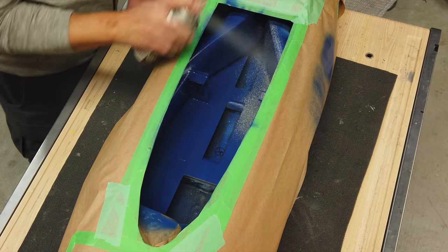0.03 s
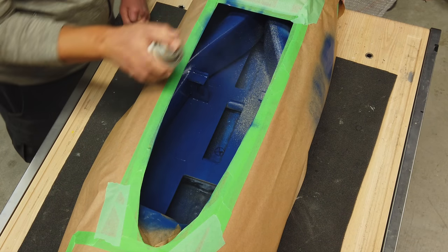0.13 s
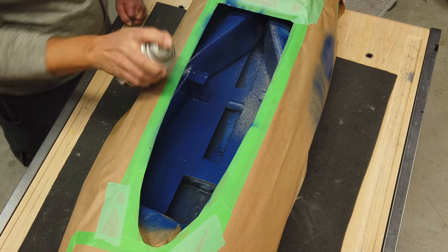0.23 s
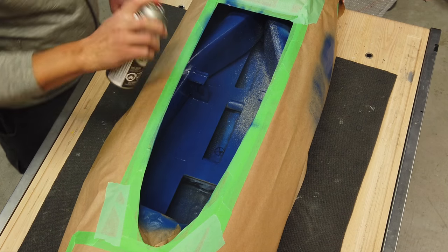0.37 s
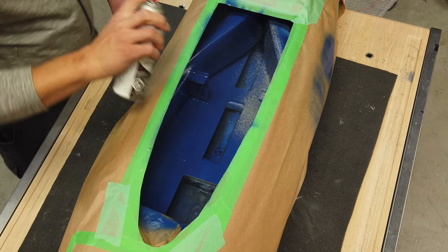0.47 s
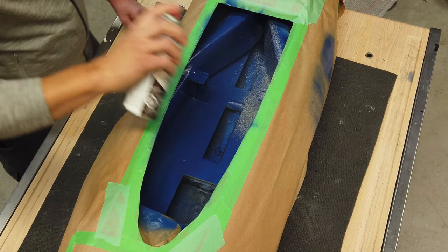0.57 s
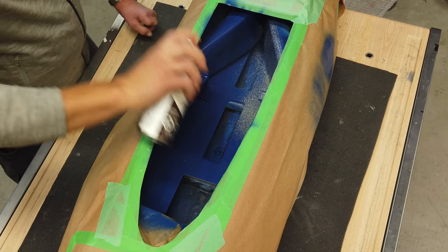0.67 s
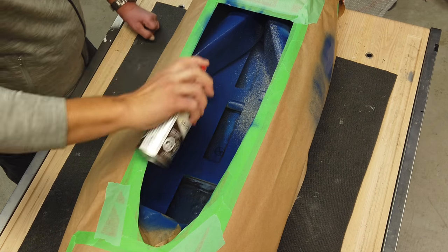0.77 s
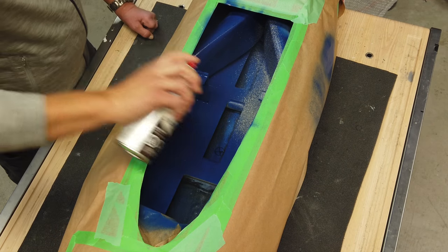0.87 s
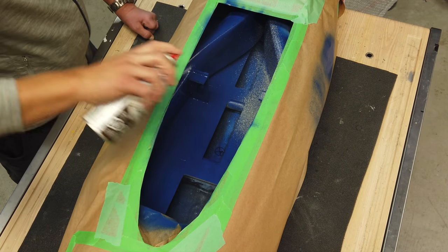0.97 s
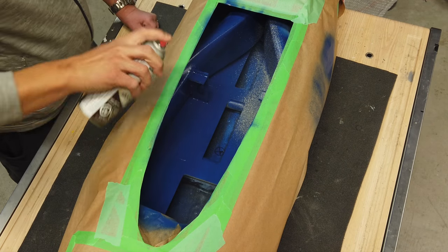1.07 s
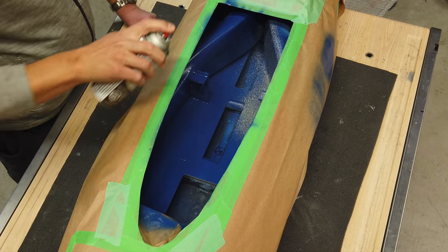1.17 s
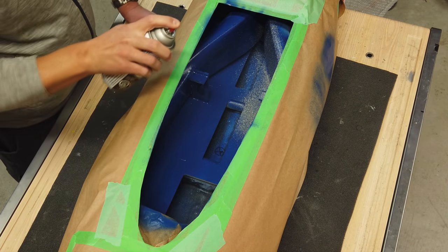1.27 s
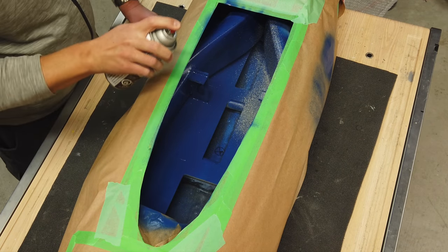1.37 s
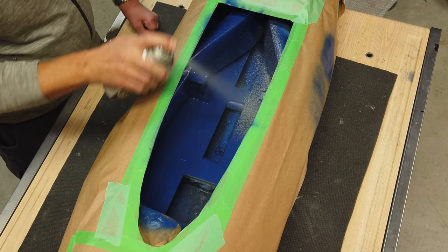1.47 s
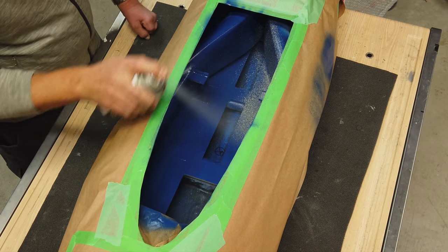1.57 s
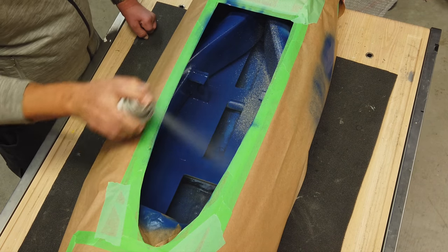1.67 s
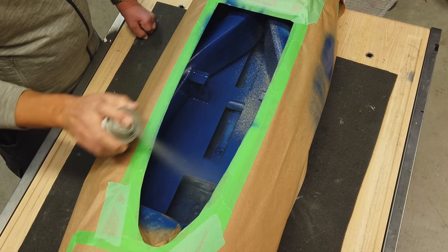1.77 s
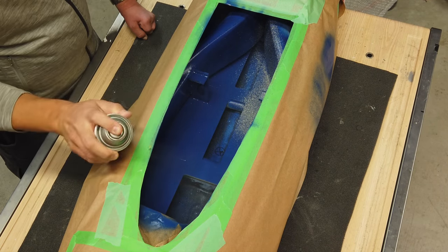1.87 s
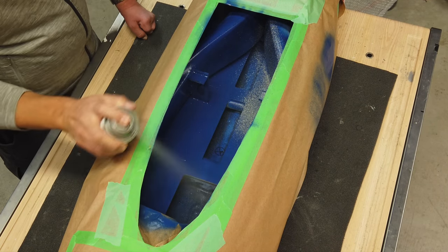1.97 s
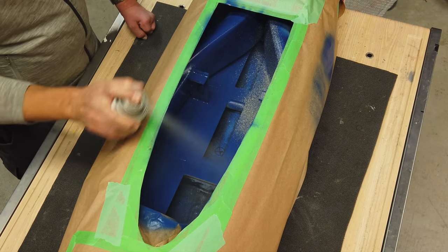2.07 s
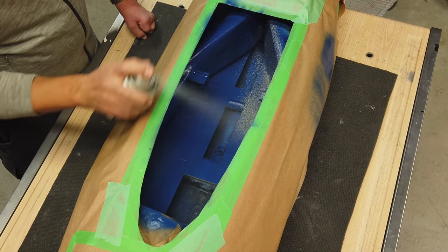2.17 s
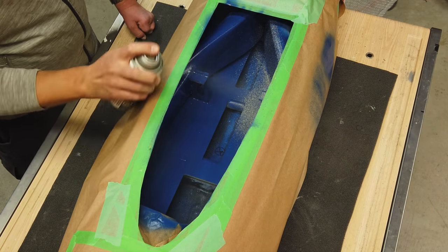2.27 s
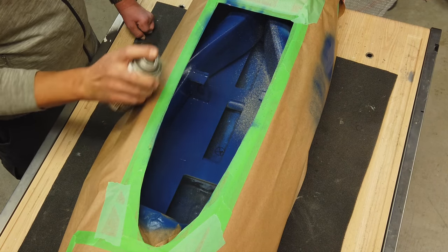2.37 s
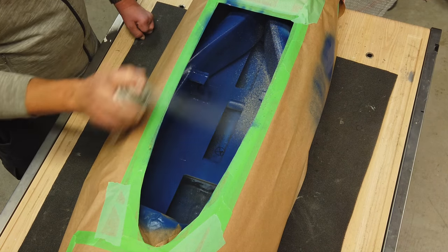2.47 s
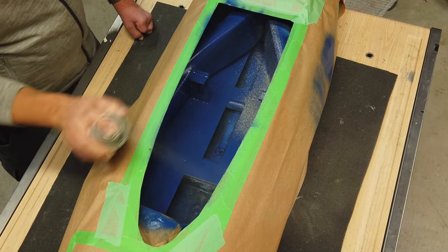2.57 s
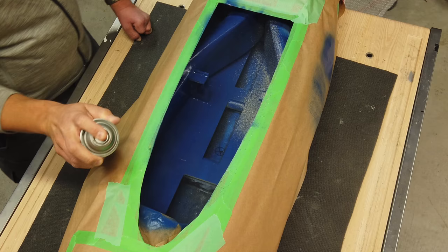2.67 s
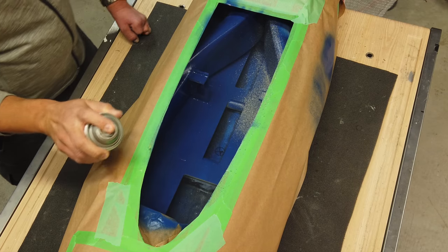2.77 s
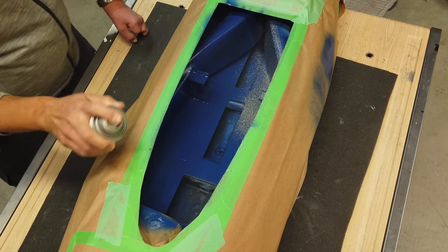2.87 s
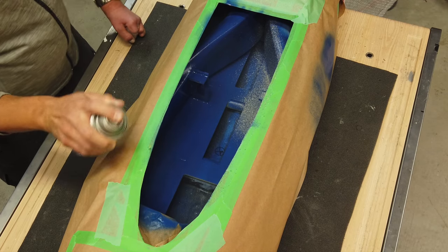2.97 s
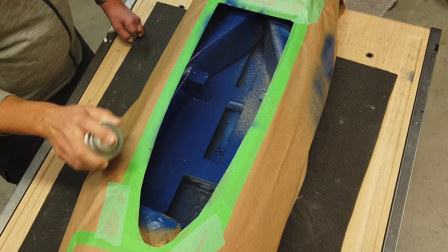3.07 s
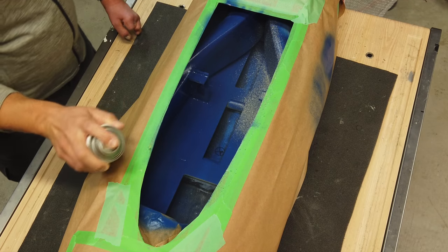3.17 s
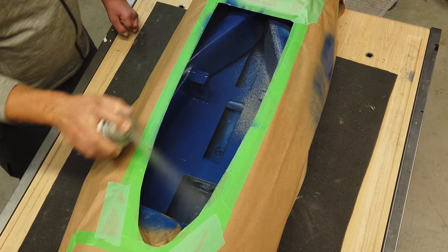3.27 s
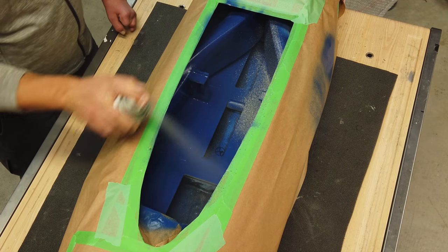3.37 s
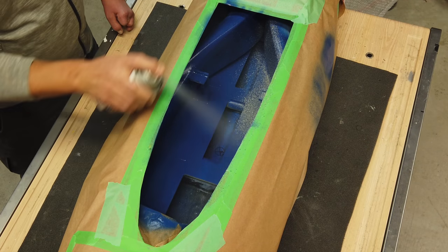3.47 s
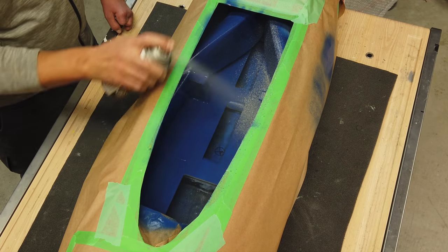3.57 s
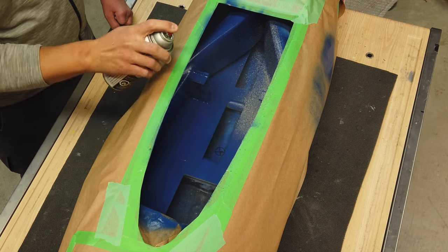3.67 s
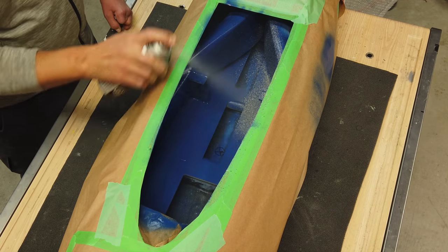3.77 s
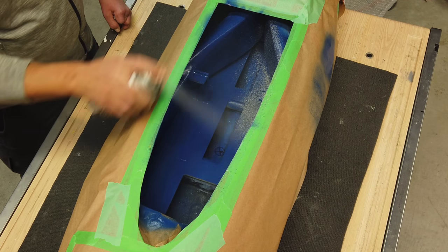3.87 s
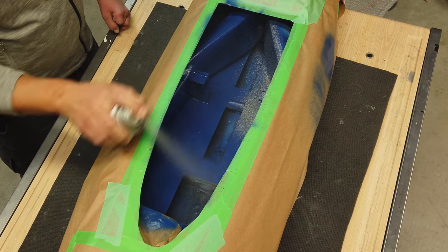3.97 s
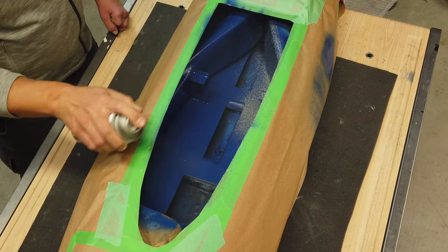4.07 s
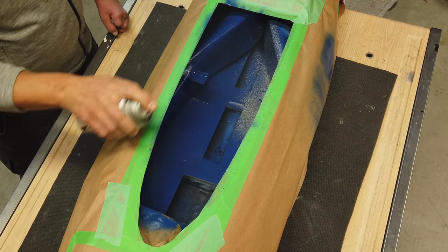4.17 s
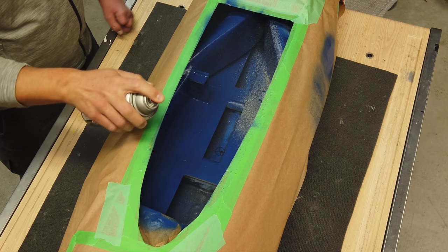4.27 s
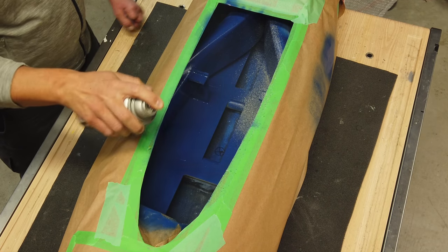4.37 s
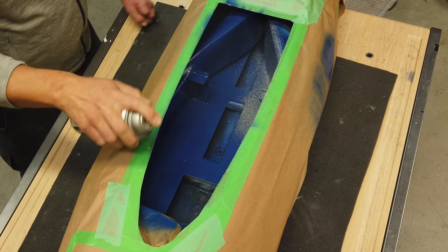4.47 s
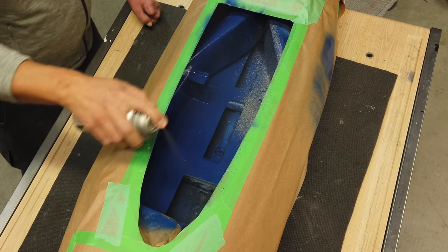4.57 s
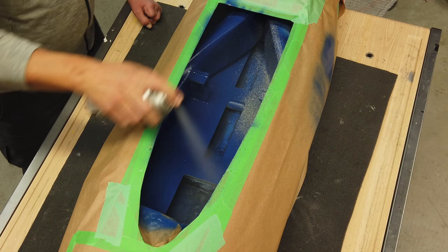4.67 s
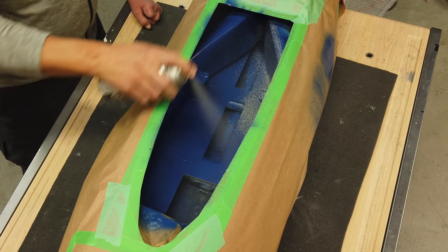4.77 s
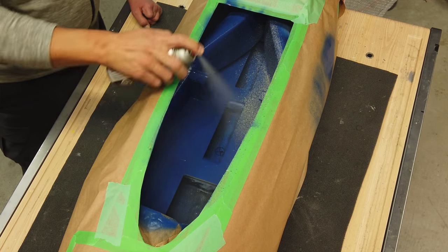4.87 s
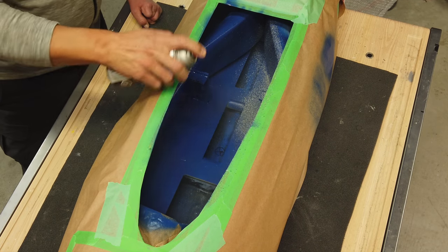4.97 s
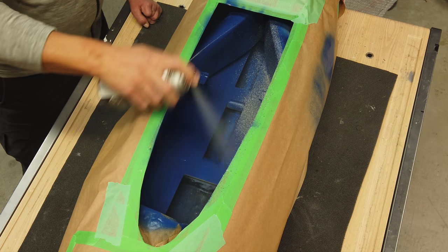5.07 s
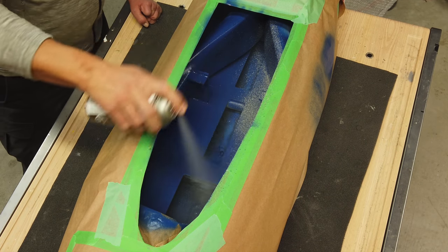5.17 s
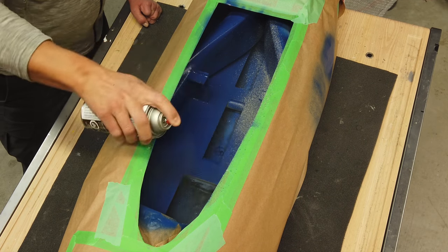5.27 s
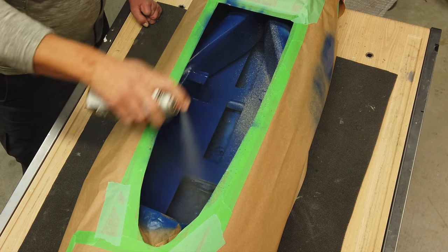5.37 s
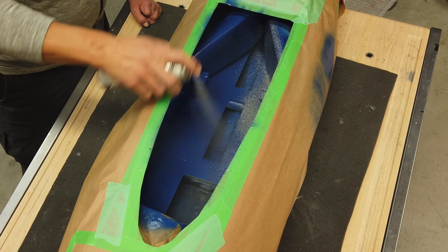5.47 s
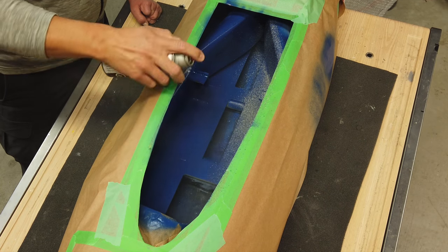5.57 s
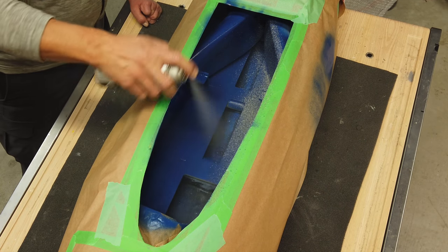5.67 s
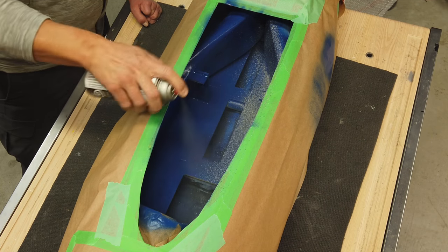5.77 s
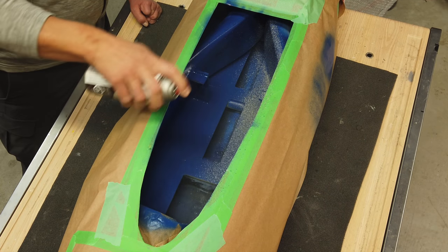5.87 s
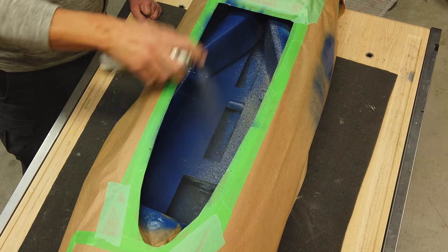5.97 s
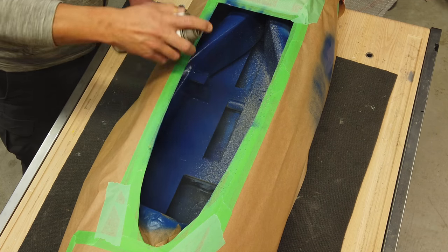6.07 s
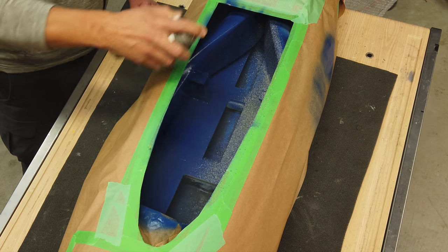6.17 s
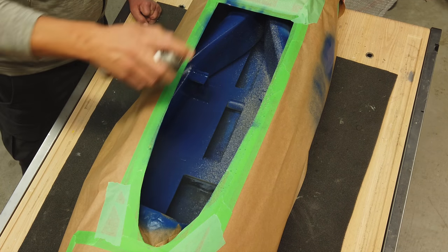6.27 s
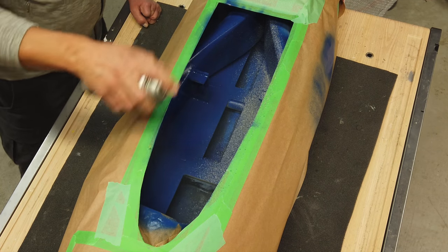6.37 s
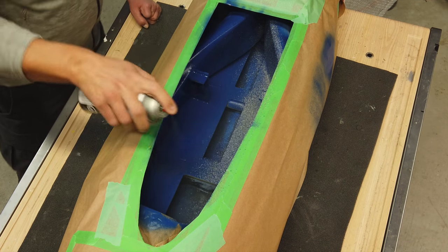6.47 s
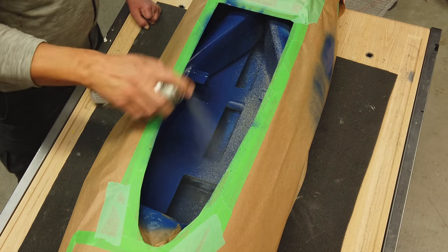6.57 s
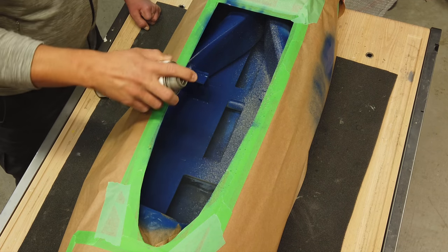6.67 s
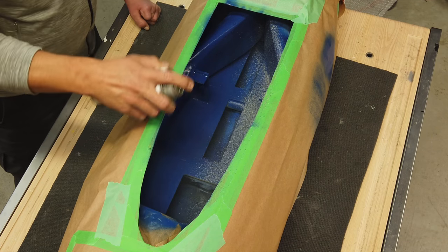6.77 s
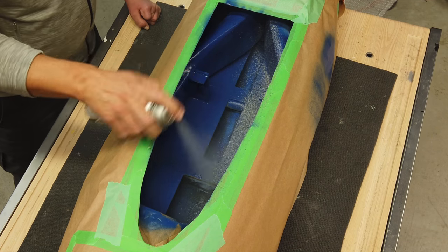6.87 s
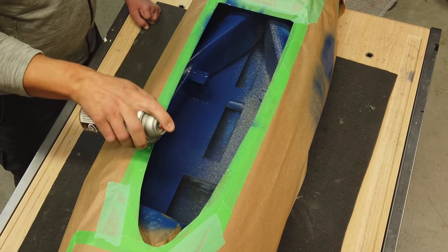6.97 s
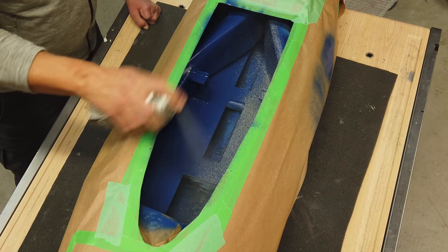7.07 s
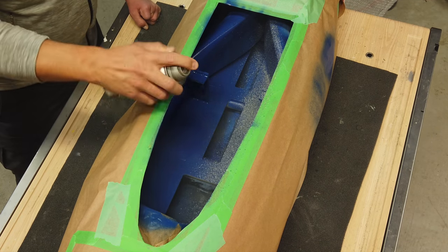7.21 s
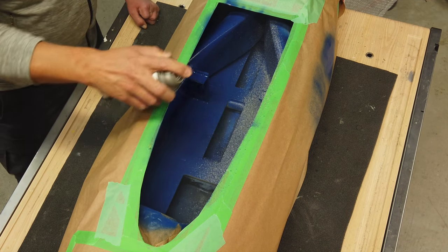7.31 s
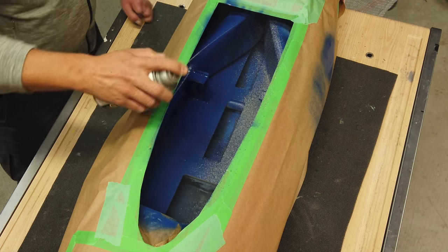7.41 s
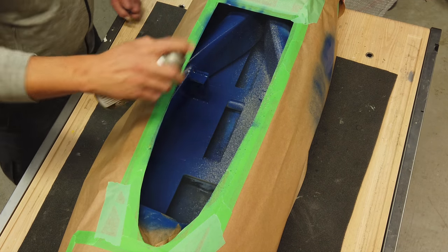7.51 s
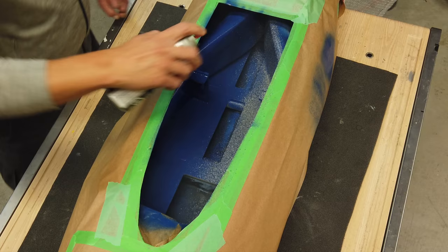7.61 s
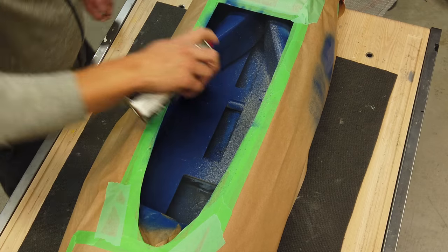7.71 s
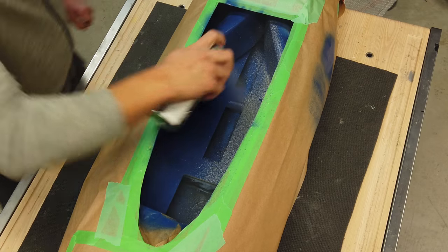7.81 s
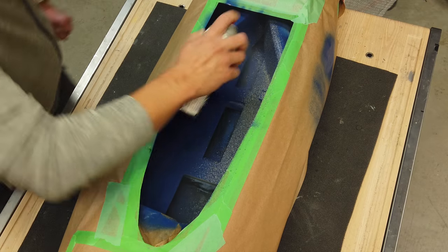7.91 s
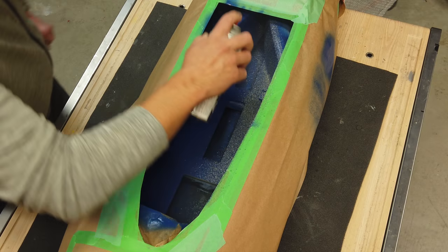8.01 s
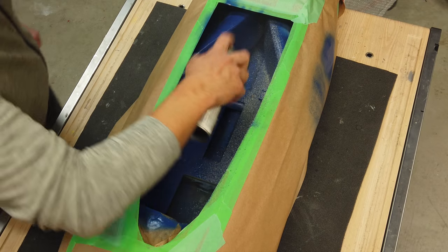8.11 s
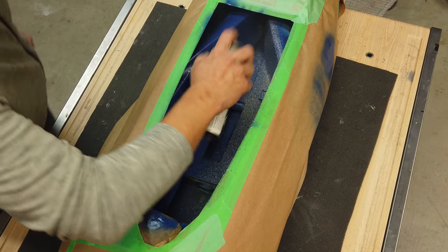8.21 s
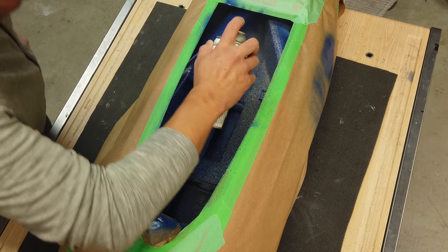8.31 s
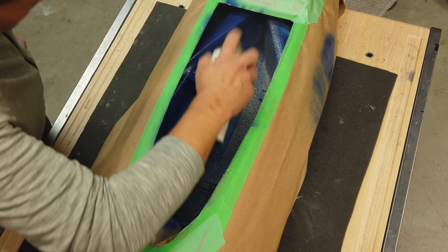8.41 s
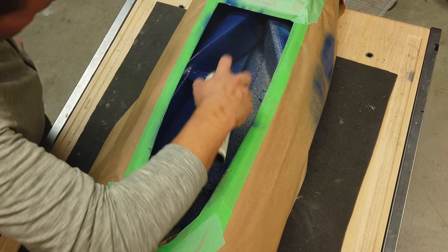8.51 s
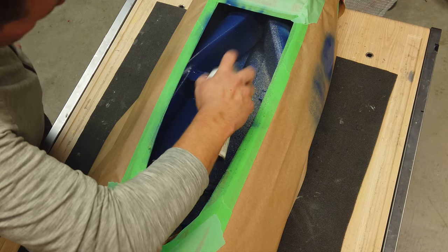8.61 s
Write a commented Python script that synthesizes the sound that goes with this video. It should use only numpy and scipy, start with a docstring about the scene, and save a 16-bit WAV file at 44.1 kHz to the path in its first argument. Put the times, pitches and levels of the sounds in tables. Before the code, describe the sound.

Short hisses from a can of spray paint are heard close up in stereo at a workshop bench. After the opening puffs and a hollow knock, the can sprays in uneven groups, its tone shifting a little as it sweeps over a hull. Occasional low bumps sound underneath. The spraying turns to quick puffs, and near the end comes a thud and a soft brush of cloth on paper. The room is small and quiet, with a short echo.

```python
"""A small quiet workshop, a stereo microphone near the bench, where an aerosol can sprays paint in
short bursts into a hollow hull. The jet hisses through the nozzle's pipe resonances, splashes on the
hull and swishes with the echo off its wall. Hull and bench get a few bumps, a sleeve brushes masking
paper, and metal rings once, faintly. The room rings on for about a third of a second over room tone,
a faint mains hum and a low rumble."""
import sys
import numpy as np
from scipy import signal
from scipy.fft import rfft, irfft
from scipy.io import wavfile
from scipy.ndimage import uniform_filter1d, map_coordinates

SR = 44100
rng = np.random.default_rng(int(sys.argv[2]) if len(sys.argv) > 2 else 0)


def digitize_waveform(pressure):
    """Quantize a signal to 16-bit integers and store it at the path in sys.argv[1].

    Rows of a 2-D input are taken as channels; values are limited to [-1, 1].
    """
    field = np.atleast_2d(pressure).T
    bounded = np.clip(field, -1, 1)
    quanta = np.round(bounded * 32767).astype(np.int16)
    wavfile.write(sys.argv[1], SR, quanta)


N = 381465
LEAD = SR // 4  # samples of scene before time zero


def gain_of(db):
    return 10 ** (np.asarray(db) / 20)


def unit_rms(x):
    return x / np.sqrt(np.mean(x ** 2) + 1e-20)


def curve_at(points, hz):
    """Interpolate (f/Hz, value) points along log frequency."""
    f, value = np.transpose(points)
    return np.interp(np.log(hz + 1), np.log(f + 1), value)


def patchy_noise(colour, patchy_db, size=N):
    """Noise of rms 1 in the given colour, with patches of its spectrum drifting by patchy_db."""
    frames, hz = size // 256 + 5, np.fft.rfftfreq(1024, 1 / SR)
    real, imag, patches = rng.standard_normal((frames, 513, 3)).T
    patches = unit_rms(uniform_filter1d(uniform_filter1d(patches, size=12, axis=0), size=18, axis=1))
    level_db = np.where(hz > colour[-1][0], -120, curve_at(colour, hz))[:, None] + patchy_db * patches
    spectra = (real + 1j * imag) * gain_of(level_db)
    return unit_rms(signal.istft(spectra, nperseg=1024, noverlap=768)[1][:size])


def jet_hiss(t):
    """The nozzle is a short pipe ringing near 1, 3 and 5 times 2.7 kHz; its hiss shifts with the aim."""
    # bands of the hiss, low to high: f/Hz, level/dB
    body_band = [(900, -23), (1500, 2.5), (2200, 5.5), (2900, 7.5), (3500, -1), (4200, -23.5)]
    edge_band = [(2500, -37.5), (3100, -0.5), (3600, 3.5), (4200, 3), (4750, 0.5), (5150, -2.5),
                 (6200, -4.5), (7200, 0)]
    whistle_band = [(4200, -42.5), (4550, 7.5), (4800, -4.5), (5000, 5.5), (5300, -44)]  # strongest when the jet points toward the microphone
    ring_band = [(5800, -40), (6700, -16.5), (7400, -4.5), (8200, -1), (8900, -6.5), (9400, -13.5),
                 (10000, -24.5)]
    gap_band = [(8300, -33.5), (9200, -11.5), (10100, -7), (11000, -8.5), (11800, -6)]  # fills when the jet points across
    fizz_band = [(10300, -23.5), (11300, -1), (12600, 5), (14000, 4.5), (15000, -0.5), (16500, 0.5)]
    # the sweeping can: t/s, aim as 4 kHz over 2.5 kHz/dB, ring level/dB, fizz level/dB
    sweep = [(.09, 3.5, -2, -0.5), (.25, 1.5, -2.5, 2), (.32, 1, -10.5, -26), (1.51, 2, -4, -1.5),
             (1.75, 0.5, -4, 0), (1.91, -3, -1, -3.5), (2.07, 0, -0.5, 3.3), (2.24, -2.5, -2.5, -8.5),
             (2.29, 2.5, -2, 4), (2.6, 0, -1, 1.5), (2.68, 1, 1.5, -0.5), (3.32, -3, 1.5, 2),
             (3.5, -0.5, -2.5, -0.5), (3.62, 1, -3.5, 0), (3.85, 1, 1.5, -2.5), (4.1, 2.5, -1, 4),
             (4.7, 1.5, -1, -1.5), (4.9, 4, 1, 0), (5.03, 1.8, 2, 1.7), (5.15, 3.5, 3.5, 0),
             (5.33, 3, -1.5, -0.5), (5.6, 3.5, -0.5, -0.5), (5.8, 5, -1, 0.2), (6.1, 4, -0.5, 1.5),
             (6.6, 2.4, -1.5, -1), (7.0, 2.7, -2, -0.5), (7.25, 2, 0, -1), (7.901, 2.9, 3, 2),
             (8.35, 3, -1, -2.5)]
    times, *curves = np.transpose(sweep)
    aim, ring_db, fizz_db = [np.interp(t, times, curve) for curve in curves]
    # the treble bands drift most as the can sweeps past edges of the hull
    body = gain_of(-2 - aim / 2) * patchy_noise(body_band, 1.6, len(t))
    edge = gain_of(-2.5 + aim / 2) * patchy_noise(edge_band, 1.9, len(t))
    whistle = gain_of(-14.5 + 1.8 * aim) * patchy_noise(whistle_band, 2.5, len(t))
    gap = gain_of(fizz_db - 5.5 - 1.5 * aim) * patchy_noise(gap_band, 3.2, len(t))
    ring = gain_of(ring_db) * patchy_noise(ring_band, 2.1, len(t))
    fizz = gain_of(fizz_db) * patchy_noise(fizz_band, 3, len(t))
    return body + edge + whistle + gap + ring + fizz


def spray(t):
    """Each press of the valve lets out the jet, which splashes on the hull; droplets make it sputter."""
    # valve presses: opens t/s, shuts t/s, finger travel/s, flow level/dB, splash over flow/dB
    presses = [(-.2, -0.037, .005, -36, -9.5), (0.076, 0.225, 0.0069, -36.5, -6.5),
               (0.322, 0.354, 0.0044, -42.5, -3.5), (1.495, 1.918, 0.012, -38, -7),
               (2.059, 2.375, 0.0061, -36.5, -8.5), (2.482, 2.679, 0.0052, -34.5, -9),
               (3.305, 3.747, 0.0094, -35.5, -9.5), (3.822, 4.117, 0.013, -35, -8),
               (4.689, 5.032, 0.0048, -36.5, -11), (5.098, 5.333, 0.0098, -36, -10.5),
               (5.425, 5.639, 0.0097, -34.5, -10.5), (5.738, 5.884, 0.0067, -33.5, -9.5),
               (6, 6.103, 0.0049, -34.5, -8.5), (6.597, 6.725, 0.0046, -36, -12),
               (6.897, 7.025, 0.0059, -35.5, -8.5), (7.16, 7.272, 0.0021, -35.5, -8.5),
               (7.889, 8.002, 0.0044, -39, -4), (8.302, 8.39, 0.0034, -37.5, -8)]
    # paint hitting the hull: f/Hz, level/dB
    splash_band = [(60, -28.5), (130, -19.5), (250, -6), (450, 0.5), (1000, 2.5), (1500, 2), (2300, -27.5)]
    spring_s, build_s = 0.043, 0.084
    jet = jet_hiss(t)
    splash = patchy_noise(splash_band, 1.5, len(t))
    sputter_db = 0.69 * unit_rms(uniform_filter1d(rng.standard_normal(len(t)), size=90))
    out = np.zeros(len(t))
    for opens, shuts, finger_s, flow_db, splash_db in presses:
        on = slice(*np.searchsorted(t, [opens - .05, shuts + .08]))
        since = (t[on] - opens).clip(0)
        opening = (1 - np.exp(-since / finger_s)) ** 4.5  # each burst starts softly, then rises sharply
        closing = np.clip(.65 - (t[on] - shuts) / spring_s, 0, 1) ** 2.13
        flow = gain_of(flow_db) * opening * closing
        building_db = splash_db - 3.5 * np.exp(-since / build_s)  # builds as the jet fills the hull
        out[on] += flow * (jet[on] + gain_of(building_db) * splash[on])
    return out * gain_of(sputter_db)


def wall_echo(x, t):
    """Echo off the near hull wall; its delay wanders as the can sweeps, so the hiss swishes."""
    echo_db, delay_s, swing_s = -16, 0.001173, 0.00048
    wander = np.interp(t, np.linspace(t[0], t[-1], num=40), rng.uniform(-1, 1, size=40))
    delayed_index = np.arange(len(t)) - SR * (delay_s + swing_s * wander)
    return gain_of(echo_db) * map_coordinates(x, [delayed_index], order=1)


def room_reverb(x):
    """Sparse reflections of random sign die band by band; the can moves, so three tails take turns."""
    # the workshop's decay: f/Hz, t60/s
    decay_times = [(60, 0.69), (250, 0.4), (1000, 0.37), (3000, 0.35), (4900, 0.45), (6000, 0.38),
                   (8000, 0.3), (14000, 0.27)]
    # colour of the tail, as the jet beams its peaks: f/Hz, level/dB
    colour = [(200, 6.5), (2000, 3), (4900, -2.5), (6200, 4.5), (8200, -3), (10200, 8), (13000, -4.5)]
    reverb_db, turn_s = -9, .5
    slots, out = np.arange(300, SR - 20, 20), np.zeros(len(x))
    for k in range(3):
        taps = np.zeros(SR)
        taps[slots + rng.integers(0, 20, len(slots))] = rng.choice([-1., 1.], len(slots))
        hz, t, spectra = signal.stft(taps, SR, nperseg=256)
        tail_db = curve_at(colour, hz)[:, None] - 60 * t / curve_at(decay_times, hz)[:, None]
        tail = signal.istft(spectra * gain_of(tail_db), SR, nperseg=256)[1]
        turn = np.cos(np.pi * (np.arange(len(x)) / SR / turn_s + k / 3)) * np.sqrt(2 / 3)
        out += signal.fftconvolve(x * turn, tail / np.linalg.norm(tail))[:len(x)]
    return gain_of(reverb_db) * out


def mains_hum(t):
    """One faint low tone that wavers in level."""
    hum_hz, rms_db = 121, -83
    waver = 1 + 0.11 * unit_rms(uniform_filter1d(rng.standard_normal(N), size=6000))
    return gain_of(rms_db) * np.sqrt(2) * waver * np.sin(2 * np.pi * hum_hz * t)


def low_rumble(t):
    """A low rumble that swells and fades now and then."""
    # the rumble's spectrum: f/Hz, level/dB
    colour = [(8, -6), (20, -0.5), (36, -19.5), (52, 0.5), (90, -57)]
    # rumble swells: peak t/s, level/dB, half width/s
    swells = [(0.0, -71, 0.12), (.9, -68, 0.39), (2.3, -70, 0.15), (2.7, -77.5, 0.16), (3.4, -75, .1),
              (5.47, -65.5, 0.16), (5.9, -73, .1), (7.25, -70, 0.27), (8.2, -63.5, 0.44)]
    rest_db = -76
    slow_noise = signal.resample(rng.standard_normal(N // 100), N)
    hz = np.fft.rfftfreq(N, 1 / SR)
    rumble = unit_rms(irfft(rfft(slow_noise) * gain_of(curve_at(colour, hz)), N))
    swelling = sum(gain_of(db) * np.exp(-((t - peak) / width) ** 2) for peak, db, width in swells)
    return (gain_of(rest_db) + swelling) * rumble


def room_tone():
    """The quiet workshop's own soft noise, strongest in the bass."""
    # its spectrum: f/Hz, level/dB
    colour = [(47, -47.5), (80, 5.5), (122, -23), (151, 2), (212, -5.5), (1620, -13), (4470, -16),
              (8610, -17.5), (12700, -17.5)]
    return gain_of(-74) * patchy_noise(colour, patchy_db=1.2)


def bandpass(x, low_hz, high_hz):
    return signal.sosfilt(signal.butter(2, [low_hz, high_hz], "band", fs=SR, output="sos"), x)


def hull_bumps():
    """Each bump is a rough contact, duller when soft, that rings hull and bench, thuds and cracks."""
    # bumps: t/s, level over the first 50 ms/dB, contact decay/s, lowest f/Hz, hardness as top f/Hz
    bumps = [(.21, -59, 0.091, 90, 198), (0.794, -44, 0.047, 199, 1480), (0.819, -41.5, 0.034, 156, 476),
             (2.103, -43, 0.019, 118, 210), (2.142, -57.5, 0.14, 60, 157), (2.267, -49.5, 0.072, 100, 260),
             (2.561, -47, 0.089, 95, 290), (3.35, -58.5, 0.05, 180, 300), (3.899, -54, 0.11, 180, 292),
             (5.453, -60, 0.11, 45, 120), (6.487, -63, 0.038, 410, 1880), (7.917, -38, 0.017, 118, 353),
             (7.959, -46.5, 0.034, 55, 297)]
    # modes of hull and bench: f/Hz, level/dB, t60/s
    modes = [(75.8, 7.5, 0.65), (106, 8.5, 0.18), (138, 3.5, 0.11), (179.4, -22, 0.18), (259, -9.5, 0.17),
             (286, 7, 0.044), (385, -1.5, 0.069), (406, -0.5, 0.19), (486, 7.5, 0.14), (656, -8, 0.037),
             (950, 7, .04), (1050, 3.5, .03), (1230, 9, 0.022), (1540, -2.5, 0.013), (2050, 3, 0.017),
             (3000, 4.5, .01)]
    thud_db = -4.5  # relative to the ring
    t, out = np.arange(SR) / SR, np.zeros(N + LEAD)
    hull = sum(gain_of(db - 60 * t / t60) * np.sin(2 * np.pi * hz * t) / np.sqrt(t60)
               for hz, db, t60 in modes)
    for start, db, contact_s, low_hz, hard_hz in bumps:
        rough = rng.standard_normal(SR) * np.exp(-t / contact_s)
        push = bandpass(rough, low_hz, hard_hz)
        ring = unit_rms(signal.fftconvolve(push, hull)[:SR])
        crack = unit_rms(bandpass(rough * np.exp(-t / .02), low_hz, 3 * hard_hz))
        crack_gain = gain_of(-25.5) * hard_hz / 1000  # harder contacts crack louder
        bump = ring + gain_of(thud_db) * unit_rms(push) + crack_gain * crack
        onset_rms = np.sqrt(np.mean(bump[:SR // 20] ** 2))
        span = out[LEAD + round(start * SR):][:SR]
        span += gain_of(db) * bump[:len(span)] / onset_rms
    return out


def sleeve_brushes(t):
    """A sleeve rubs softly over the masking paper, each stroke one arch of level."""
    # strokes: t/s, length/s, peak level/dB
    strokes = [(2.975, 0.23, -66), (8.014, 0.39, -61)]
    # cloth friction: f/Hz, level/dB
    colour = [(300, -27), (650, -9), (1050, 0.5), (1600, -6), (2700, -2), (3300, -5), (5000, -0.5),
              (8000, -7), (12600, -13.5)]
    lean = .8  # under 1: loudest before the middle
    level = sum(gain_of(db) * np.sin(np.pi * ((t - start) / length).clip(0, 1) ** lean)
                for start, length, db in strokes)
    return level * patchy_noise(colour, patchy_db=2.5, size=len(t))


def metal_ring(t):
    """Metal rings faintly with one thin dying tone."""
    # the ring: t/s, level/dB, f/Hz, t60/s
    tones = [(4.2, -71, 1080, 1.1)]
    start, db, hz, t60 = tones[0]
    since = np.maximum(t - start, 0)
    return gain_of(db - 60 * since / t60) * np.sin(2 * np.pi * hz * since)


def stereo_side(mid, colour, patchiness):
    """Side signal: the mid's short-time levels, coloured, in random phase, coming and going in patches."""
    hz, _, spectra = signal.stft(mid, SR, nperseg=512)
    spin, patches = rng.standard_normal(spectra.shape[::-1] + (2,)).T
    patches = unit_rms(uniform_filter1d(uniform_filter1d(patches, size=10, axis=0), size=16, axis=1))
    share = 1 / (1 + np.exp(-patchiness * (patches + 0.1)))
    spectra = spectra * np.exp(2j * np.pi * spin) * gain_of(curve_at(colour, hz))[:, None] * share
    return signal.istft(spectra, SR, nperseg=512)[1][:len(mid)]


def scene():
    """The work at the bench, near the microphone, with the room behind it, as left and right."""
    # stereo width of the work and of the background: f/Hz, greatest side level over mid/dB
    work_width = [(1900, -69.5), (2700, -72), (3200, -1.5), (6500, 1), (7500, -5), (8500, -37), (9500, 6),
                  (12000, -6), (15500, -10.5)]
    background_width = [(60, -12), (130, -15), (290, 1.5), (640, -7.5), (3100, -1.5), (12600, 10.5)]
    t_early = np.arange(-LEAD, N) / SR  # the first burst starts before time zero
    t = t_early[LEAD:]
    hiss = spray(t_early)
    near = hiss + wall_echo(hiss, t_early) + hull_bumps() + sleeve_brushes(t_early)
    work = (near + room_reverb(near))[LEAD:]
    background = mains_hum(t) + low_rumble(t) + room_tone()
    side = stereo_side(work, work_width, patchiness=9)
    side += stereo_side(background, background_width, patchiness=0.37)
    return work + background + metal_ring(t) + np.array([side, -side])


def record(dry):
    """Both channels are cut off steeply at 15.9 kHz."""
    lowpass = signal.firwin(511, 15900, window=("kaiser", 9), fs=SR)
    return signal.oaconvolve(dry, lowpass[None], "same")


dry = scene()
out = record(dry)
digitize_waveform(out)
```